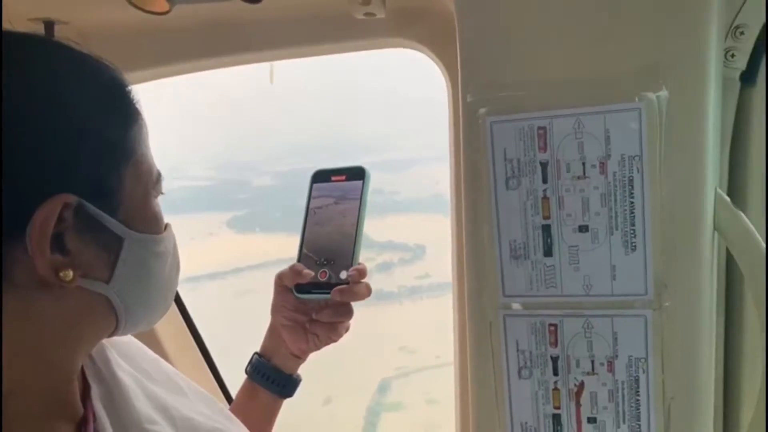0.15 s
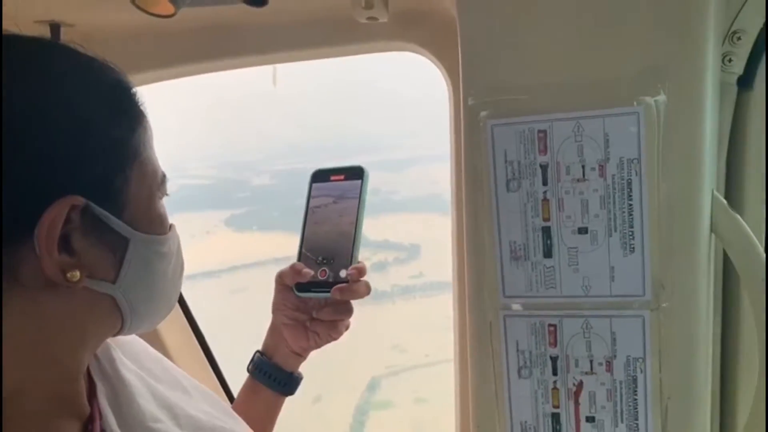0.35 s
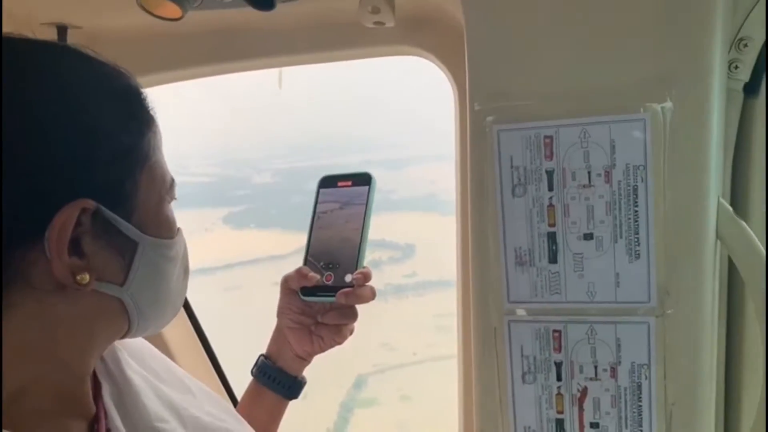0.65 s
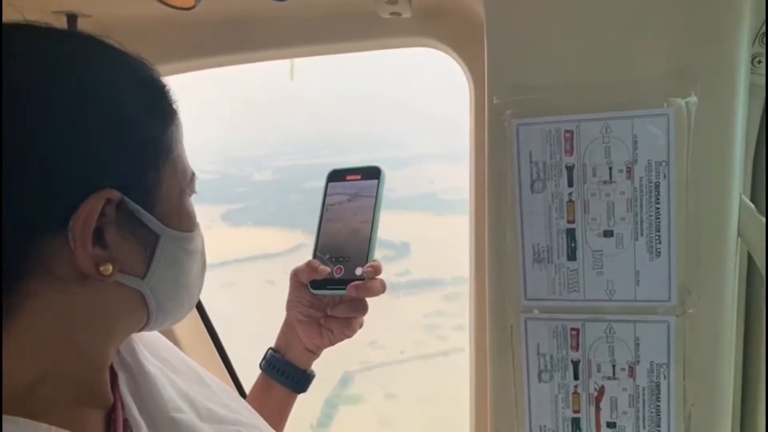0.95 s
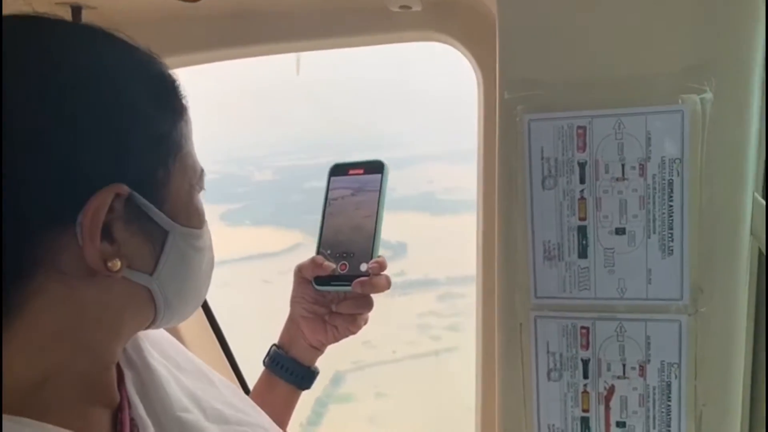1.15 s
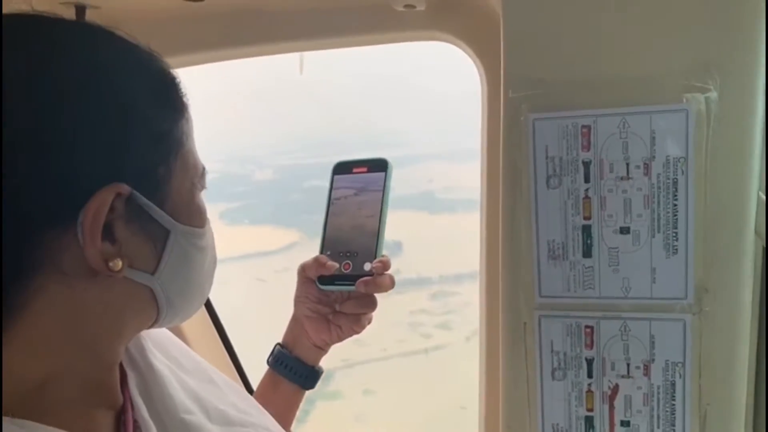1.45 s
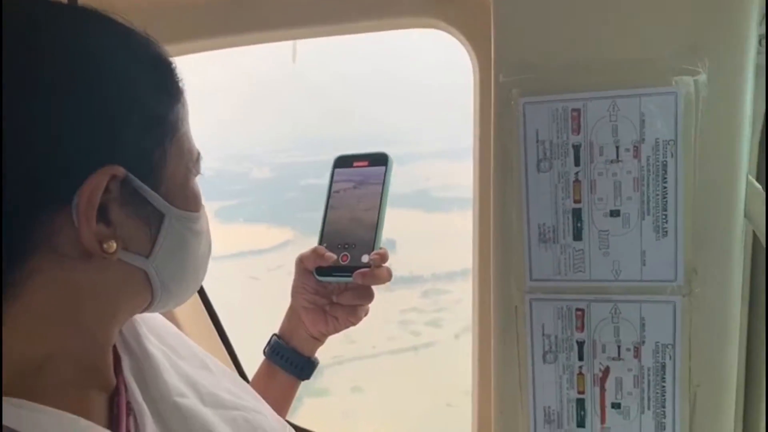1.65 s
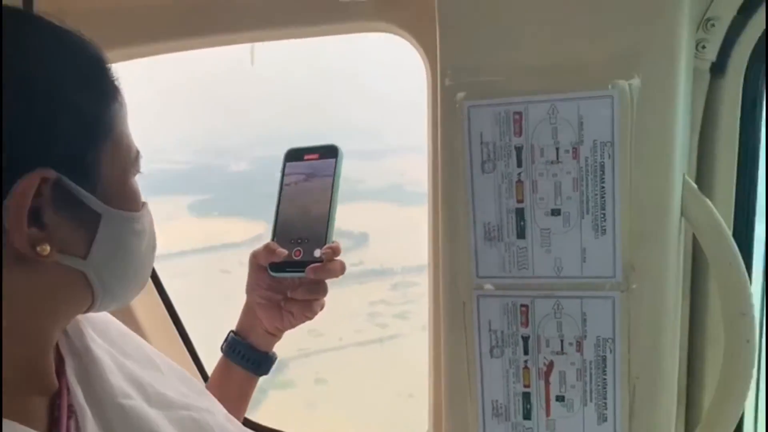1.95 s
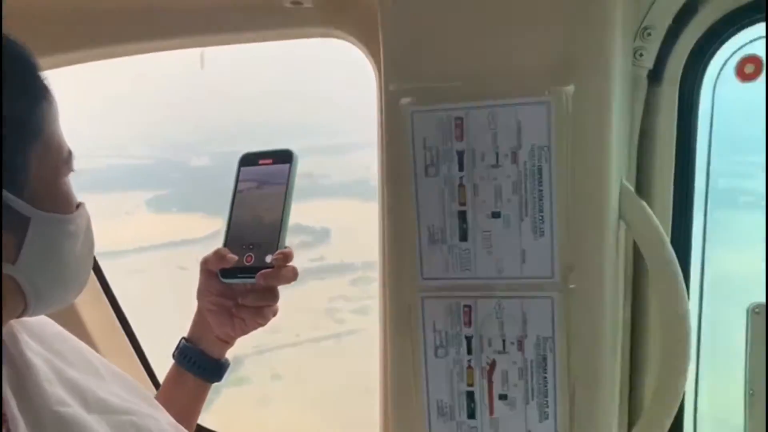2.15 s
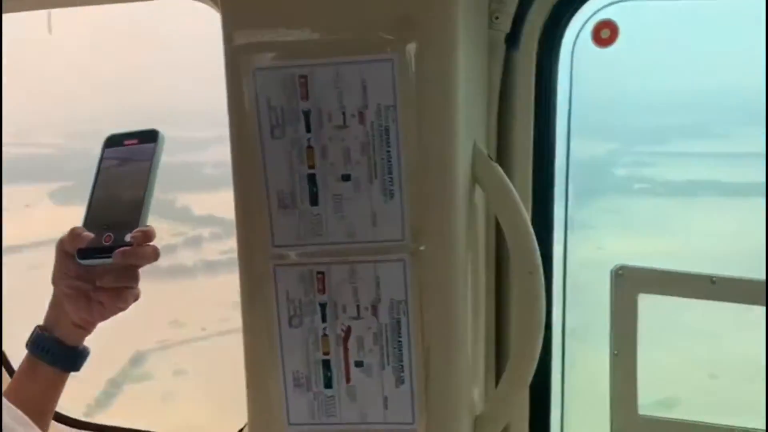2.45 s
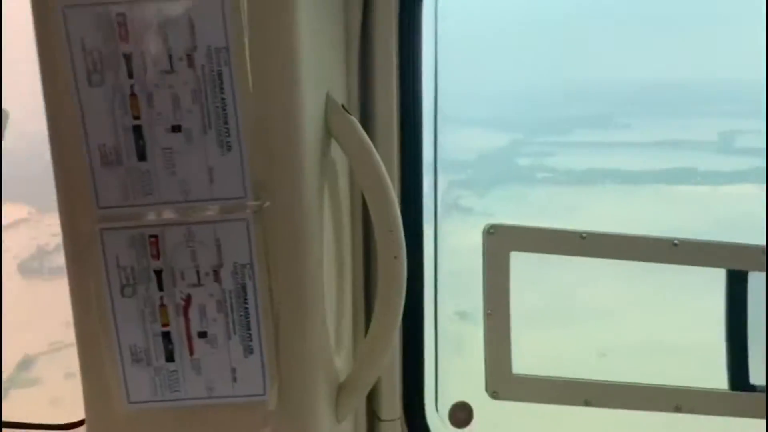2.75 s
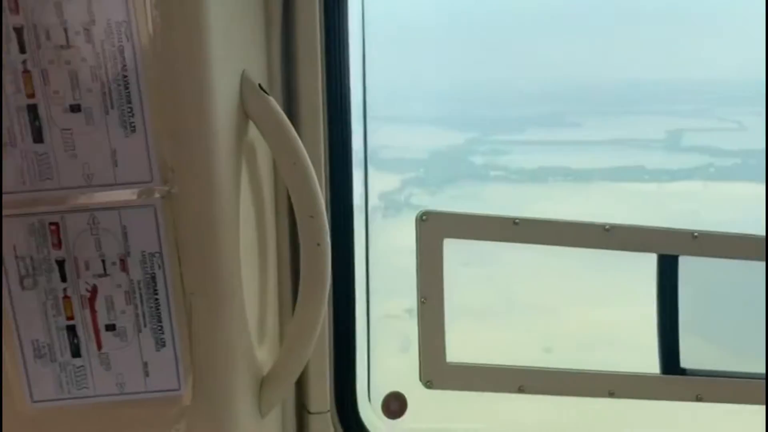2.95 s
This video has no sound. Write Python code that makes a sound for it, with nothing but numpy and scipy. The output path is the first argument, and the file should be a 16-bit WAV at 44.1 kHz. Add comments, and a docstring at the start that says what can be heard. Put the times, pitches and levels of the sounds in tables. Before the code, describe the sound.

Helicopter cabin noise in steady cruise fills all 3 seconds, already running at the start and cut off at the end. Low rotor thumps beat about 26 times a second beneath a broad, bass-heavy airflow roar. A clear high gear whine near 2.3 kHz and a fainter higher one waver in level and side; around 2.5 seconds, as the handheld stereo phone turns, the fainter whine dips, then returns.

```python
"""Cabin of a small turbine helicopter in cruise, heard by a handheld phone with two microphone ports.
The four-blade rotor thumps as phase-locked sines at multiples of its turn rate. Drive shaft and gear teeth
whine as sines that share one slightly wandering speed. Airflow over the skin roars as coloured noise, its level
uneven in small patches and throbbing at the blade rate. Near the end the phone turns and the whines shift."""
import sys
import numpy as np
from scipy import signal
from scipy.fft import rfft, irfft
from scipy.io import wavfile
from scipy.ndimage import uniform_filter1d

SR = 44100
rng = np.random.default_rng(int(sys.argv[2]) if len(sys.argv) > 2 else 0)


def to_wav(s):
    """Save 16-bit WAV."""
    ch = np.atleast_2d(s).T  # columns
    pcm = np.round(np.clip(ch, -1, 1) * 32767)  # PCM
    wavfile.write(sys.argv[1], SR, pcm.astype(np.int16))


N = 136710
T = np.arange(N) / SR
COARSE_S = np.linspace(0, N / SR, 400)  # time grid of slow controls
PORTS = np.array([[.5], [-.5]])  # shares a left-right difference between left and right
ROTOR_HZ, SHAFT_HZ, WHINE_HZ = 6.614, 98.58, 2752.  # at nominal speed
MESH_TEETH = 23
BLADES, BLADE_S = 4, .018  # blade count, moment of a blade pass


# Rotor lines. Each entry: multiple of the rotor turn.
ROTOR_TURNS = [4, 6, 7, 8, 12, 16, 18, 32]
# Each row, one per multiple: level in dB, left minus right in dB, left lead in rad.
ROTOR_LINES = [(-31, 0, 0), (-37, 0, 0), (-40, 0, 0), (-18.3, 0, 0), (-22.2, 1, -.2), (-32, 0, 0),
               (-46, 0, 0), (-28.5, -3.2, .1)]
THUMP_RAD, SPREAD_RAD = -1.0, .05  # common phase; growth with multiple squared, smearing the thump


def rotor(run):
    """Blade passes and rotor turns: a harmonic series locked in phase, so the lines add into thumps."""
    out = 0
    for turn, (db, pan_db, lead_rad) in zip(ROTOR_TURNS, ROTOR_LINES):
        hz = turn * ROTOR_HZ
        phase_rad = THUMP_RAD + SPREAD_RAD * turn ** 2
        cycles = hz * (run - BLADE_S) + phase_rad / (2 * np.pi)
        level_db = db + phone_db(hz, COARSE_S)
        out = out + tone(cycles, level_db, pan_db, lead_rad, waver_db=.5, sway_rad=.0004 * hz)
    return out


def drive_line(run, hz, row):
    """One continuous, slightly wavering drive-train sine; higher pitches sway more between the ports."""
    db, pan_db, lead_rad = row
    cycles = hz * run + rng.random()
    level_db = db + phone_db(hz, COARSE_S)
    return tone(cycles, level_db, pan_db, lead_rad, waver_db=1.6, sway_rad=.35 * hz / (hz + 600), rate_hz=2.5)


# Drive shaft lines. Each entry: multiple of the shaft turn.
SHAFT_TURNS = [1, 5, 7, 8, 9, 10, 11, 12, 13, 14, 15, 16, 18, 19, 20, 21, 22, 24, 25, 26, 27, 30, 33, 35,
               39, 32, 37]
# Each row, one per multiple: level in dB, left minus right in dB, left lead in rad.
SHAFT_LINES = [(-37.8, -1.3, -0.0), (-52.1, 6.5, 0.1), (-44.8, 4.9, -0.1), (-49.3, 2.6, -0.0),
               (-49.6, 8.8, 1.4), (-49.1, 3.4, 0.9), (-52.6, 3.5, 1.6), (-49.6, -1.6, -2.3),
               (-50.6, 11.2, 3.1), (-52.2, 4.5, 1.4), (-49.1, -1.3, 0.0), (-50.0, 4.1, 0.5),
               (-51.0, -0.7, -2.8), (-55.0, 11.3, 2.8), (-50.9, -1.8, 1.9), (-42.1, -1.3, 1.5),
               (-42.3, 1.5, -1.5), (-43.7, -0.2, -0.9), (-42.5, 1.2, -1.0), (-51.9, -0.4, -0.4),
               (-51.9, 3.8, 2.9), (-57.9, -0.3, -2.8), (-55.0, 2.8, -0.5), (-58.2, -0.4, 0.2),
               (-57.0, 2.3, 1.0), (-59.0, 2.4, -2.4), (-62.7, -1.6, 0.0)]


def shaft(run):
    """Drive shaft: sines at whole multiples of the shaft turn."""
    return sum(drive_line(run, turn * SHAFT_HZ, row) for turn, row in zip(SHAFT_TURNS, SHAFT_LINES))


# Remaining drive-train tones: gears, pumps, fans, blade-rate sidebands of the main mesh, two more
# shaft multiples. Each entry: pitch in Hz at nominal speed.
OTHER_HZ = [59.7, 187.4, 234.5, 329, 461.9, 634.8, 653.5, 680, 708.1, 861, 878.4, 2240.6, 2323.5, 6168,
            6364, 6652, 6804, 9434, 2685, 2837, 1308, 2214.5, 2294, 3056, 3352]
# Each row, one per tone: level in dB, left minus right in dB, left lead in rad.
OTHER_LINES = [(-30.5, 0, 0), (-39, 0, .3), (-43.5, -4, .7), (-47, -.5, 0), (-50.5, 1, .3), (-48, -2, .5),
               (-40, 2, .1), (-47.5, -2, .3), (-55, 5, -.1), (-43, 1, .4), (-47, -2, 1.2), (-50.5, -3, 2.4),
               (-50, -1, -2), (-56, -1.5, 3.1), (-67.5, 1, -.9), (-63, 2, -1.6), (-65.5, -3, .6),
               (-67, -2.5, -3), (-57.5, -.5, -.2), (-60, -.5, -.1), (-52, 1, .5), (-53, 2, 2.5),
               (-51, 1, 2.6), (-61, 2, 3), (-60, 3, 2.8)]


def other_drive_tones(run):
    """Gears, pumps, fans, mesh sidebands and two shaft multiples: sines on the same wandering speed."""
    return sum(drive_line(run, hz, row) for hz, row in zip(OTHER_HZ, OTHER_LINES))


def whine(run, hz, rows, octave_rows):
    """Gear-tooth whine and its octave, whose level, side and phase follow the phone's movement."""
    base = tone(hz * run, *curve(rows, COARSE_S), waver_db=.8, sway_rad=.1, rate_hz=8.)
    octave = tone(2 * hz * run, *curve(octave_rows, COARSE_S), waver_db=2., sway_rad=.25, rate_hz=8.)
    return base + octave


# Main gear mesh as the phone moves.
# Each row: time in seconds, level in dB, left minus right in dB, left lead in rad.
MESH_PATH = [(0.15, -32.3, 0.4, -3.0), (0.4, -31.3, -1.7, -3.4), (0.65, -30.6, -3.6, -3.8),
             (0.9, -30.6, -3.8, -3.7), (1.15, -30.1, -3.2, -3.1), (1.4, -30.6, -1.8, -2.8),
             (1.65, -31.3, -1.4, -2.9), (1.9, -31.0, -2.1, -3.1), (2.15, -29.7, -2.4, -3.3),
             (2.4, -29.9, -1.1, -3.0), (2.65, -29.2, -1.4, -3.1), (2.9, -30.7, 0.2, -3.1)]
# Its octave. Each row: time in seconds, level in dB, left minus right in dB, left lead in rad.
MESH_OCTAVE_PATH = [(0.15, -64.8, -3.7, -0.0), (0.4, -60.7, -2.7, 0.2), (0.65, -56.3, 0.5, -0.2),
                    (0.9, -58.0, -0.3, 0.0), (1.15, -51.9, -3.3, 2.1), (1.4, -51.0, -3.3, 2.2),
                    (1.65, -49.7, -4.4, 2.3), (1.9, -49.3, -1.6, 3.1), (2.15, -57.8, 0.0, 6.0),
                    (2.4, -54.4, -2.2, 5.6), (2.65, -49.3, -0.1, 5.8), (2.9, -57.1, 1.1, 8.0)]


def main_mesh(run):
    """Main gear mesh: one cycle per tooth of a gear on the drive shaft."""
    return whine(run, MESH_TEETH * SHAFT_HZ, MESH_PATH, MESH_OCTAVE_PATH)


# Second gear whine as the phone moves.
# Each row: time in seconds, level in dB, left minus right in dB, left lead in rad.
WHINE_PATH = [(.15, -37, 5, -.9), (.4, -36.5, 3.5, -1.1), (.65, -37, 4, -1.6), (.9, -37.5, 4.5, -2),
              (1.15, -38, 1, -2.9), (1.4, -39.5, -.5, -3.1), (1.92, -38.5, 0, -3.0), (2.0, -36.5, 1, -1.3),
              (2.2, -35.5, 2.5, -.9), (2.46, -37.5, 3, -.9), (2.55, -49, -2, -2.5), (2.9, -46, 0, -3.8),
              (3.0, -38, 2, -4.5)]
# Its octave. Each row: time in seconds, level in dB, left minus right in dB, left lead in rad.
WHINE_OCTAVE_PATH = [(.15, -49, -5, 2.2), (.4, -50.5, -5.5, 1.9), (.65, -56, -12, .9), (.9, -52.5, -10, 2),
                     (1.15, -52.5, -12, 1.2), (1.4, -54, -7, -.2), (1.75, -53, -4, -.7), (1.9, -59, -8, .2),
                     (2.15, -56, -6, 1.5), (2.42, -61, -7, 1.5), (2.55, -52, -2, .5), (2.72, -56, -3, .5),
                     (2.95, -59, -5, 2)]


def second_whine(run):
    """Second gear whine, on the same wandering speed."""
    return whine(run, WHINE_HZ, WHINE_PATH, WHINE_OCTAVE_PATH)


# Airflow roar.
# Each row: pitch in Hz, level in dB per Hz, left minus right in dB, likeness of the ports from -1 to 1.
ROAR_SPECTRUM = [(8, -68, 0, .999), (20, -52, 0, .999), (40, -43, 0, .998), (68, -49.5, 1, 0.92),
                 (125, -48, 1, 0.92), (160, -52, 0, .85), (200, -50.5, -1.5, 0.78), (260, -54, -1.5, 0.88),
                 (388, -57, 0, 0.39), (580, -63.5, -2.5, 0.61), (650, -61, 2, .7), (713, -64, 2, 0.5),
                 (830, -67, 1.5, .4), (1080, -65.5, 0, 0.18), (1860, -67.5, -1.5, -0.04),
                 (2000, -67.5, 0, -.1), (2280, -64.5, -2, -.2), (2430, -67.5, 0, -.1),
                 (2600, -68.5, 0, -.1), (2830, -70.5, 0, -.1), (2900, -75.5, 0, -.4), (3100, -74.5, 0, -.2),
                 (4430, -76, 1.3, 0.15), (6240, -84, -1.5, 0.58), (8160, -85.5, 0, 0.57),
                 (9660, -89, 1, -0.53), (14000, -93.5, -0.5, -0.38), (15900, -102, 0, -0.44)]
THROB, THROB_TOP_HZ = .15, 1510  # swell share per blade pass, fading above this pitch
PATCH_BINS, PATCH_FRAMES = 4, 12  # uneven patch, about 170 Hz by .07 s
STFT = dict(fs=SR, nperseg=1024, noverlap=768)


def airflow(run):
    """Airflow over the skin: coloured noise, part shared by the ports, uneven in level and throbbing."""
    return throb(uneven(skin_noise()), run)


def skin_noise():
    """Noise shaped by the roar spectrum; mid and side shares set the likeness of the ports."""
    hz = np.maximum(np.arange(N // 2 + 1) * SR / N, 1)
    log_rows = [(np.log(row_hz), *rest) for row_hz, *rest in ROAR_SPECTRUM]
    db, pan_db, like = curve(log_rows, np.log(hz))
    like = np.clip(like, -.9995, .9995)
    mid, side = rfft(rng.standard_normal((2, N))) * np.sqrt(SR / 4)  # dB per Hz scale
    ports = np.sqrt(1 + like) * mid + 2 * PORTS * np.sqrt(1 - like) * side
    return irfft(undb(db + PORTS * pan_db) * ports, N)


def uneven(noise):
    """The roar swells as a whole; its level is uneven in small time-frequency patches, deeper in the treble."""
    hz, t, cells = signal.stft(noise, **STFT)
    patch = rng.standard_normal(cells.shape[1:])
    for _ in range(2):
        patch = uniform_filter1d(patch, PATCH_BINS, axis=0)
        patch = uniform_filter1d(patch, PATCH_FRAMES, axis=1)
    depth_db = 1.0 + 2.85 * hz / (hz + 4000)
    patch_db = depth_db[:, None] * patch / patch.std()
    swell_db = .24 * np.interp(t, COARSE_S, walk(3.0))
    gain = undb(patch_db + swell_db + phone_db(np.maximum(hz, 1), t))
    return signal.istft(cells * gain, **STFT)[1][:, :N]


def throb(noise, run):
    """Each blade pass swells the lower roar."""
    low = signal.sosfilt(signal.butter(1, THROB_TOP_HZ, fs=SR, output="sos"), noise)
    return noise + THROB * np.cos(2 * np.pi * BLADES * ROTOR_HZ * (run - BLADE_S)) * low


# Level change as the phone moves in the cabin.
# Each row: time in seconds, dB at 300 Hz, dB at 1000 Hz, dB at 1500 Hz, dB at 6000 Hz.
PHONE_PATH = [(0, 1, 1.5, -1, 0), (.5, 1, -0.5, 1, 0.5), (1.1, 0.5, 0, 0.5, 0.5), (1.7, 0.5, -.5, 0, -.5),
              (2.3, 0, 0, -0.5, 1), (2.6, -1, 0.5, -1, 0.5), (3.1, -2, -0.5, -0.5, 0.5)]
# Pitches of the level changes. Each entry: pitch in Hz; the first, deep bass, stays put.
PHONE_HZ = [60, 300, 1000, 1500, 6000]


def phone_db(hz, t):
    """Level change at pitch hz from the phone's movement, interpolated over log pitch."""
    columns_db = np.array([0 * t] + curve(PHONE_PATH, t))
    place = np.interp(np.log(hz), np.log(PHONE_HZ), np.arange(5))
    weights = np.maximum(1 - abs(np.reshape(place, (-1, 1)) - np.arange(5)), 0)
    return weights @ columns_db


# Drive train speed. Each row: time in seconds, parts in 10000 off nominal.
SPEED_PATH = [(0, 0), (.45, 1), (.95, 5), (1.25, -7.5), (1.45, -8.5), (1.85, -2), (2.25, 4), (2.5, 1),
              (3.1, 13.5)]


def turns():
    """Running time of the drive train in seconds, stretched by its speed."""
    return np.cumsum(1 + curve(SPEED_PATH, T)[0] / 10 ** 4) / SR


def tone(cycles, db, pan_db, lead_rad, waver_db, sway_rad, rate_hz=2.93):
    """A sine at both ports whose level, side and phase waver as the cabin field shifts."""
    waver = waver_db * (walk(rate_hz) + 1.33 * walk(16.))
    side_db = pan_db + 3.1 * sway_rad * walk(rate_hz)
    gains = undb(db + waver + PORTS * side_db)
    shifts_rad = PORTS * (lead_rad + sway_rad * walk(rate_hz))
    ports = []
    for gain, shift_rad in zip(gains, shifts_rad):
        wave = np.sin(2 * np.pi * cycles + np.interp(T, COARSE_S, shift_rad))
        ports.append(-np.sqrt(2) * np.interp(T, COARSE_S, gain) * wave)  # levels are RMS
    return np.array(ports)


def walk(rate_hz):
    """Smooth random wander on the coarse time, about rate_hz changes a second (18 at most); spread near 1."""
    steps = np.repeat(rng.standard_normal(64), 8)
    smooth = uniform_filter1d(uniform_filter1d(steps, 8), 8)
    place = COARSE_S * min(rate_hz, 18) * 8 + 16
    return 1.3 * np.interp(place, np.arange(512), smooth)


def curve(rows, x):
    """All columns of a table read at x."""
    table = np.array(rows, float)
    return [np.interp(x, table[:, 0], column) for column in table.T[1:]]


def undb(db):
    """Decibels to gain."""
    return 10 ** (np.asarray(db) / 20)


def scene():
    """Rotor, drive train and airflow at the two ports."""
    run = turns()
    drive = shaft(run) + other_drive_tones(run) + main_mesh(run) + second_whine(run)
    return rotor(run) + drive + airflow(run)


FADE_S, TOP_HZ = .004, 15200


def record(dry):
    """A fade-in of a few milliseconds avoids a click at the start; the top is cut."""
    low_pass = signal.ellip(10, .2, 80, TOP_HZ, fs=SR, output="sos")
    return signal.sosfilt(low_pass, dry * np.minimum(T / FADE_S, 1))


dry = scene()
out = record(dry)
to_wav(out)
```